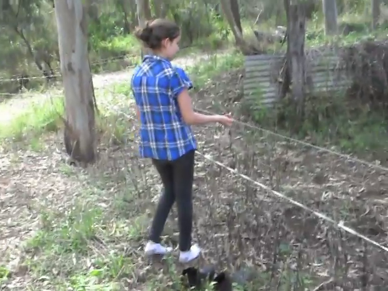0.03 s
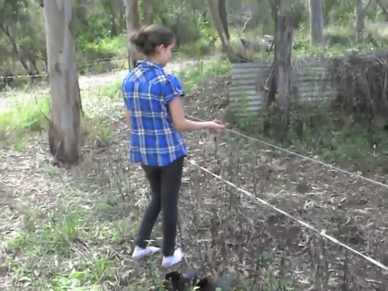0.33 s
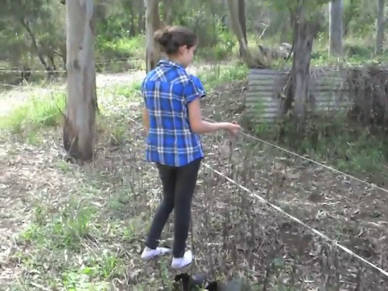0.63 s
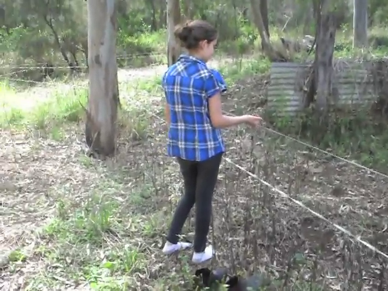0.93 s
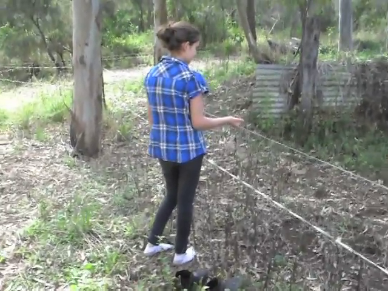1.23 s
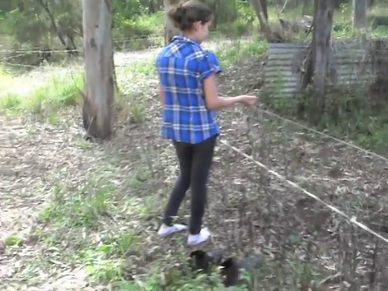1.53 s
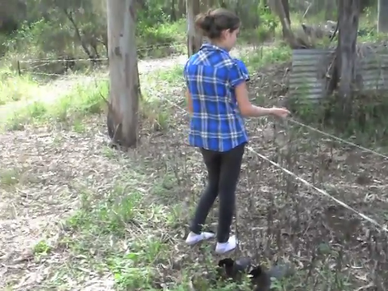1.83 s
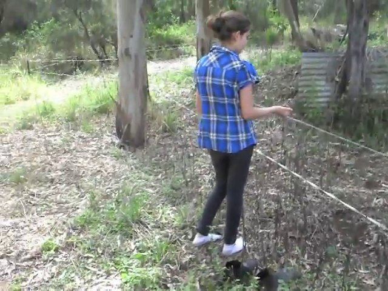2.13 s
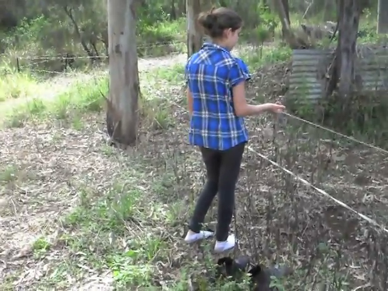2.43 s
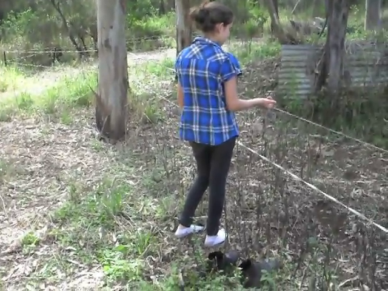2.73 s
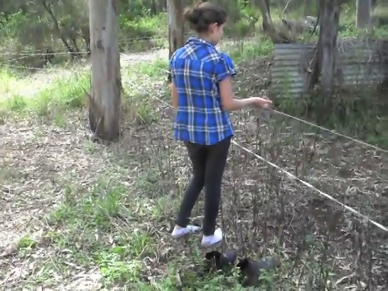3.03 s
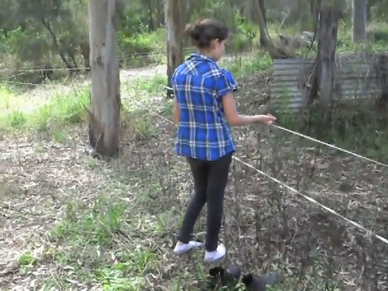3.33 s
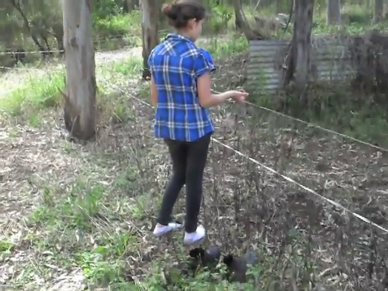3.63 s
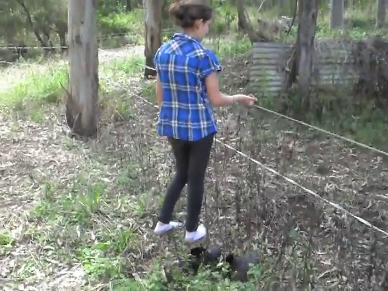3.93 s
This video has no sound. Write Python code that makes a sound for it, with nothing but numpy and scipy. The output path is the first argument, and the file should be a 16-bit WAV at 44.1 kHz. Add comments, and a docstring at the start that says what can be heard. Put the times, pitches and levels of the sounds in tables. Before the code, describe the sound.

A far, low engine hum and even hiss fill a quiet yard among trees, with soft wind on the microphone. A few dry ticks, one short low blip and three thin chirps pass before the breeze grows a little.

```python
"""A quiet wooded yard, one microphone. From the start a far engine drones under a steady hiss,
light air rumbles on the microphone and the camera adds a faint high whine.
Dry litter ticks now and then, and at 0.6 s one short low note drops in pitch.
A small bird gives three thin, high chirps among the trees, the last just after 2 s.
Then the engine slows a little, the gusts pick up and a low murmur of air swells."""
import sys
import numpy as np
from scipy import signal
from scipy.fft import rfft, irfft
from scipy.io import wavfile

SR = 44100
rng = np.random.default_rng(int(sys.argv[2]) if len(sys.argv) > 2 else 0)


def wav_out(sig):
    """Save sig, one row per channel (or a flat mono array), as 16-bit PCM at SR to the path in sys.argv[1]."""
    wavfile.write(sys.argv[1], SR, np.round(np.clip(np.atleast_2d(sig).T, -1, 1) * 32767).astype(np.int16))


N = 176400
T = np.arange(N) / SR


def amp(db):
    """Decibels to gain."""
    return 10 ** (np.asarray(db) / 20)


def unit_rms(x):
    """Scales to an rms of 1."""
    return x / np.sqrt(np.mean(x ** 2) + 1e-20)


def curve(points):
    """Joins (s, value) points by straight lines."""
    return np.interp(T, *np.transpose(points))


def add(mix, start_s, sound):
    """Adds a sound to the mix at a time."""
    part = mix[max(round(start_s * SR), 0):][:len(sound)]
    part += sound[:len(part)]


def noise(colour):
    """Noise of rms 1. Each row of its colour: frequency in Hz, relative level in dB."""
    corner_hz, db = np.transpose(colour)
    hz = np.fft.rfftfreq(N, 1 / SR)
    gain = amp(np.interp(np.log(hz + 1), np.log(corner_hz), db))
    return unit_rms(irfft(rfft(rng.standard_normal(N)) * gain, N))


def drift(rate_hz):
    """Smooth random motion of rms 1, mostly slower than rate_hz."""
    hz = np.fft.rfftfreq(N, 1 / SR)
    lowpass = (hz > 0) * np.exp(-(hz / rate_hz) ** 2)
    return unit_rms(irfft(rfft(rng.standard_normal(N)) * lowpass, N))


def note(middle_s, length_s, hz, glide_hz_per_s, db, waver_hz=0):
    """One gliding tone that swells and fades smoothly."""
    position = np.clip((T - middle_s) / length_s, -.5, .5)
    pitch = hz + glide_hz_per_s * position * length_s + waver_hz
    return amp(db) * np.cos(np.pi * position) ** 2 * np.sin(2 * np.pi * np.cumsum(pitch) / SR)


def camera_whine():
    """Faint steady tones from the camera."""
    # Each row: frequency in Hz, rms level in dB.
    tones = [(7140, -74.5), (7853, -84)]
    return sum(np.sqrt(2) * amp(db) * np.sin(2 * np.pi * hz * T) for hz, db in tones)


def yard_air():
    """An even hiss over the yard and a soft, low murmur of air far off."""
    # Spectra. Each row: frequency in Hz, relative level in dB.
    hiss_colour = [(100, 3), (200, 9.5), (320, 9.5), (480, 8), (900, 6.5), (1600, 2.5), (2900, -0.5),
                   (4800, 0), (7200, -0.5), (8200, -3), (10000, -5.5), (12300, -3), (14000, -26)]
    murmur_colour = [(100, -36), (200, -7), (260, -4.5), (330, 3.5), (400, -5.5), (600, -28)]
    # The murmur's swell. Each row: time in seconds, level in dB.
    murmur_level = [(0, -68.5), (2, -70), (2.8, -67), (3.0, -63), (3.7, -61), (4, -69)]
    hiss_db, rise_db_per_s = -56.5, .09
    hiss = noise(hiss_colour) * amp(hiss_db + rise_db_per_s * (T - T.mean()) + .12 * drift(rate_hz=9))
    return hiss + noise(murmur_colour) * amp(curve(murmur_level))


def gusts():
    """Light air right on the microphone: a deep rumble and a low, rustling buffet."""
    # Spectra. Each row: frequency in Hz, relative level in dB.
    rumble_colour = [(5, -4), (13, 1), (28, -1), (45, -6), (70, -14), (110, -13), (150, -24.5), (200, -35),
                     (300, -32), (600, -62.5)]
    buffet_colour = [(60, -9), (110, 5), (160, 0.5), (200, 7.5), (260, -3), (400, -26.5)]
    # Gust strength. Each row: time in seconds, relative level in dB.
    rumble_level = [(0.0, -53), (0.11, -46), (0.22, -51.5), (0.65, -47), (1.15, -52), (1.47, -44.5),
                    (1.75, -47.5), (2.57, -38), (2.58, -46.5), (2.77, -43.5), (2.8, -40), (3.05, -51),
                    (3.33, -45.5), (4.0, -46)]
    buffet_level = [(0.0, -59), (0.28, -76), (0.31, -63), (0.9, -75.5), (2.21, -60), (2.34, -56),
                    (2.44, -73), (2.51, -59), (2.64, -69), (2.72, -55), (2.74, -57.5), (3.69, -66),
                    (3.98, -53.5), (4.0, -47)]
    rumble = noise(rumble_colour) * amp(curve(rumble_level) + 2.5)
    buffet = noise(buffet_colour) * amp(curve(buffet_level) - 2.5)
    return rumble + buffet


def trees(sound):
    """Trunks and leaves scatter a short, weak tail back to the microphone."""
    echo_db, t60_s = -5, .4
    tail = rng.standard_normal(SR // 2) * np.exp(-np.log(1000) * T[:SR // 2] / t60_s)
    return sound + amp(echo_db) * signal.fftconvolve(sound, tail / np.linalg.norm(tail))[:N]


def litter_ticks():
    """Tiny snaps in dry litter: bright bursts that die within milliseconds."""
    # Each row: start in seconds, onset level in dB, band centre in Hz, decay in seconds.
    snaps = [(.204, -56, 8000, .002), (.254, -56.5, 8000, .004), (.9425, -45, 4800, .001),
             (1.0805, -45, 4800, .001), (2.2195, -49, 5000, .003)]
    width_octaves = .42
    out, t = np.zeros(N), T[:SR // 10]
    hz = np.fft.rfftfreq(len(t), 1 / SR)
    for start_s, db, centre_hz, decay_s in snaps:
        band = np.exp(-.5 * (np.log2((hz + 1) / centre_hz) / width_octaves) ** 2)
        burst = unit_rms(irfft(rfft(rng.standard_normal(len(t))) * band))
        add(out, start_s, amp(db) * np.exp(-t / decay_s) * burst)
    return out


def low_note():
    """One short low note that drops in pitch."""
    # In order: middle and length in seconds, pitch in Hz, glide in Hz per second, level in dB.
    blip = (.626, .06, 310, -2400, -45.3)
    return note(*blip)


def bird():
    """A small bird's thin chirps, each falling slightly with an unsteady pitch."""
    # Each row: middle and length in seconds, pitch in Hz, level in dB.
    chirps = [(.855, .09, 4950, -64.5), (1.772, .056, 7430, -57.5), (2.074, .028, 7240, -51.5)]
    return sum(note(middle_s, length_s, hz, glide_hz_per_s=-600, db=db, waver_hz=69.4 * drift(286))
               for middle_s, length_s, hz, db in chirps)


def far_engine():
    """Low orders of a far engine that slows a little; they fade and wander on the way through the trees."""
    # Engine speed. Each row: time in seconds, pitch of the fourth order in Hz.
    speed = [(0, 82.8), (1.2, 82.8), (2.2, 82.6), (2.6, 81.7), (3.2, 81), (3.7, 79.9), (4, 79.8)]
    # Swells of the fourth order (the main note) and sixth. Each row: time in seconds, relative dB.
    fourth_level = [(0.0, -55), (0.51, -39.5), (0.89, -49), (1.11, -41), (1.31, -46), (1.35, -59),
                    (1.78, -43), (2.03, -49), (2.27, -44), (2.33, -51), (2.41, -47), (2.44, -53),
                    (2.6, -43.5), (3.32, -48.5), (3.68, -40.5), (3.79, -52), (3.92, -46.5), (4.0, -54)]
    sixth_level = [(0.0, -53), (0.99, -52), (1.2, -54.5), (2.04, -51), (2.17, -59), (2.44, -49),
                   (2.87, -51.5), (2.93, -57), (3.77, -52), (4.0, -56)]
    # Each row: multiple of the cycle rate, mean level in dB.
    weak_orders = [(3, -58.5), (5, -57), (7, -63.5), (8, -72), (10, -75.5), (12, -72)]
    waver_db, scatter_rad = 1.5, .52
    cycle_phase = 2 * np.pi * np.cumsum(curve(speed) / 4) / SR

    def tone(order, wander=0):
        return np.sqrt(2) * np.sin(order * cycle_phase + wander + 2 * np.pi * rng.random())

    out = amp(curve(fourth_level) - .5) * tone(order=4)
    out += amp(curve(sixth_level)) * tone(order=6)
    for order, db in weak_orders:
        gain = amp(db + waver_db * drift(rate_hz=2.26))
        out += gain * tone(order, wander=scatter_rad * drift(rate_hz=3.6))
    return out


def scene():
    """The whole yard at one microphone."""
    steady = far_engine() + yard_air() + gusts() + camera_whine()
    return (steady + trees(bird() + litter_ticks()) + low_note())[None]


def record(dry):
    """The recorder rolls off the treble and passes nothing above its band edge."""
    # Treble response. Each row: frequency in Hz, gain in dB.
    treble = [(10000, 0), (10500, -6), (11000, -18), (11500, -17.5), (11900, -24), (12300, -38)]
    edge_hz = 12300
    hz = np.linspace(0, SR / 2, 1025)
    gain = amp(np.interp(hz, *np.transpose(treble))) * (hz < edge_hz)
    taps = signal.firwin2(1023, hz, gain, window=("kaiser", 9), fs=SR)
    return signal.oaconvolve(dry, taps[None], "same")


dry = scene()
out = record(dry)
wav_out(out)
```